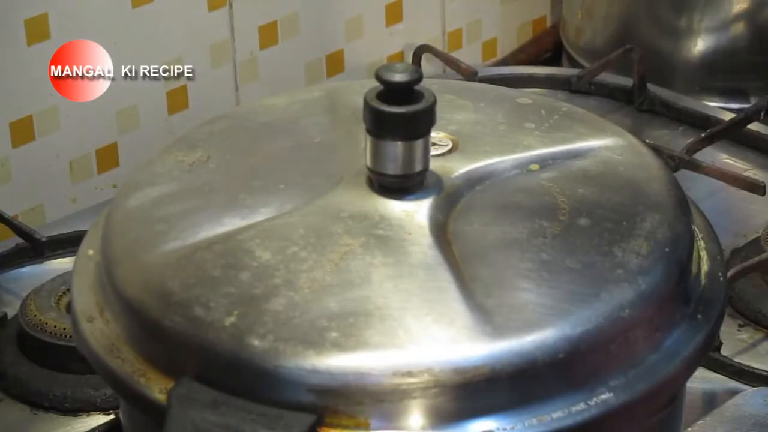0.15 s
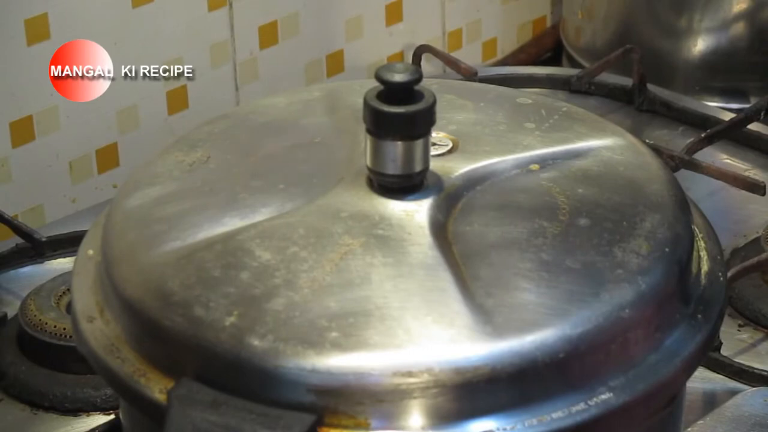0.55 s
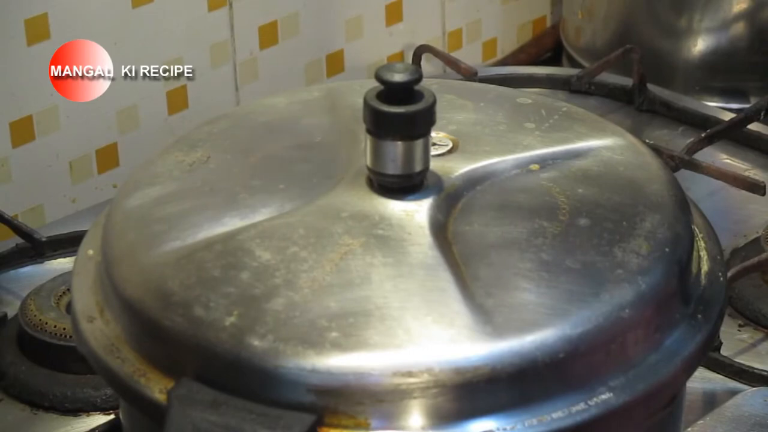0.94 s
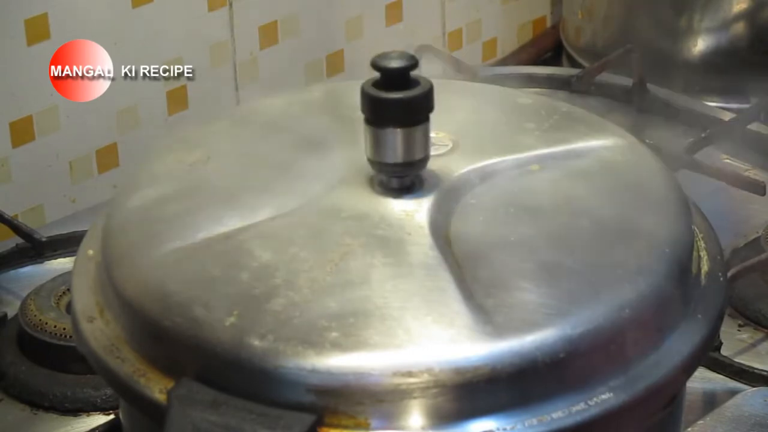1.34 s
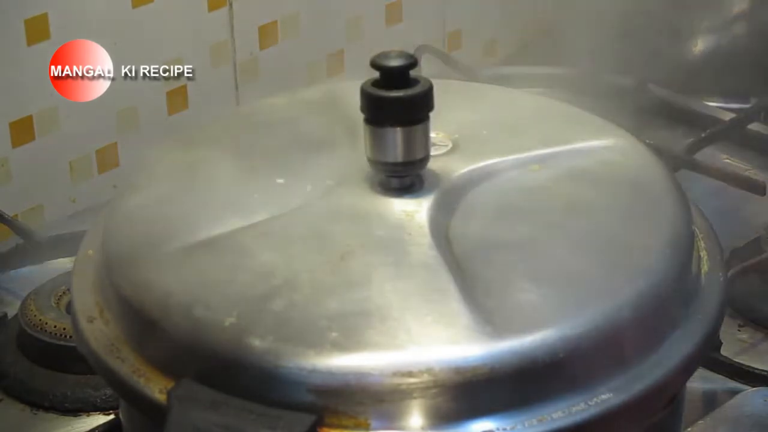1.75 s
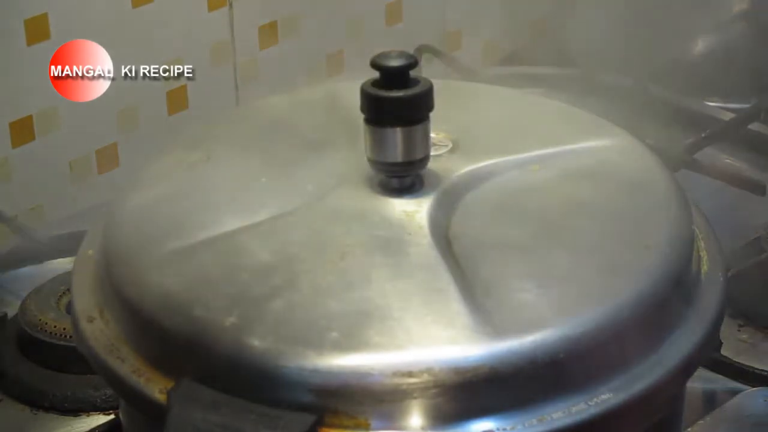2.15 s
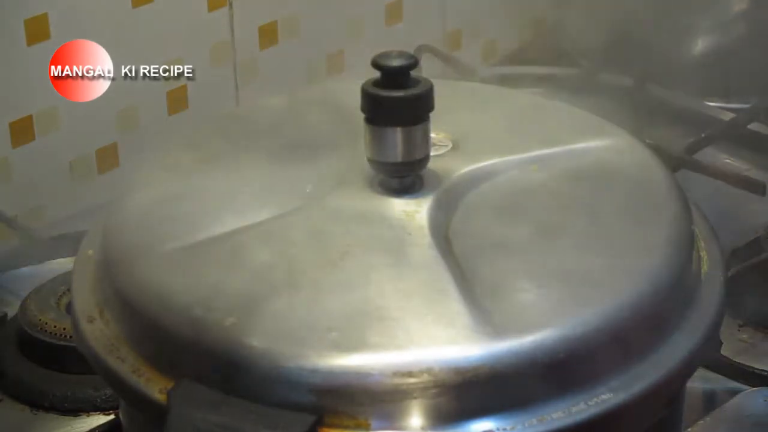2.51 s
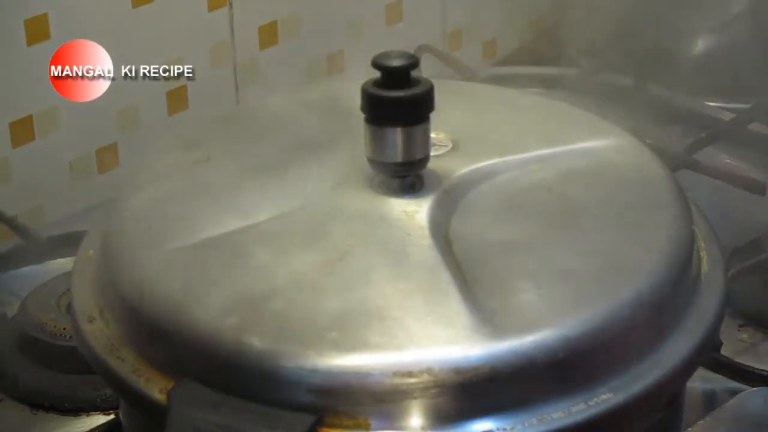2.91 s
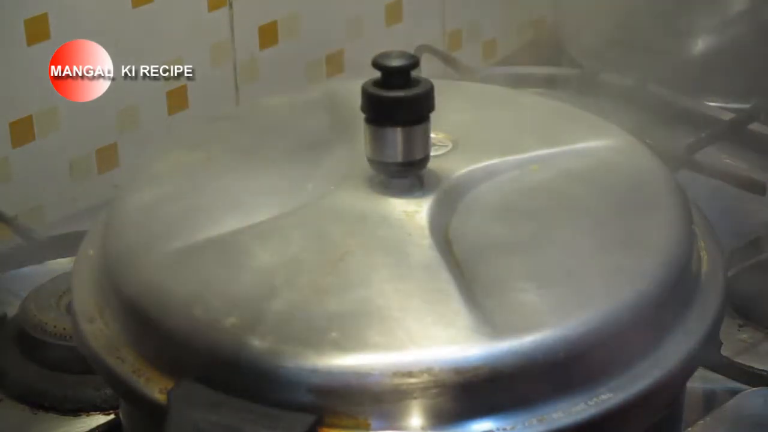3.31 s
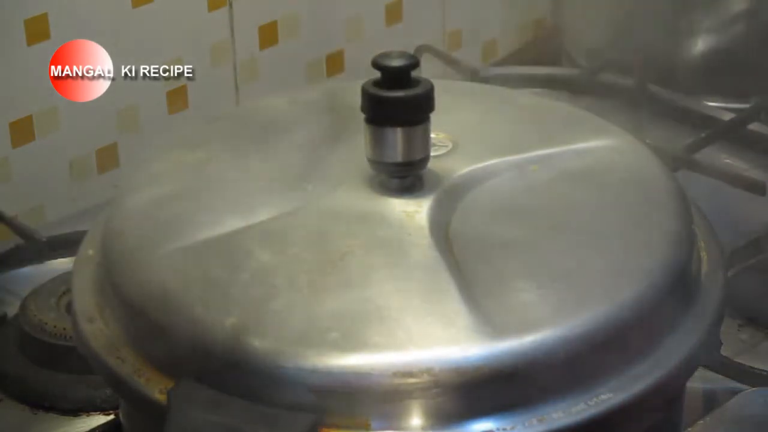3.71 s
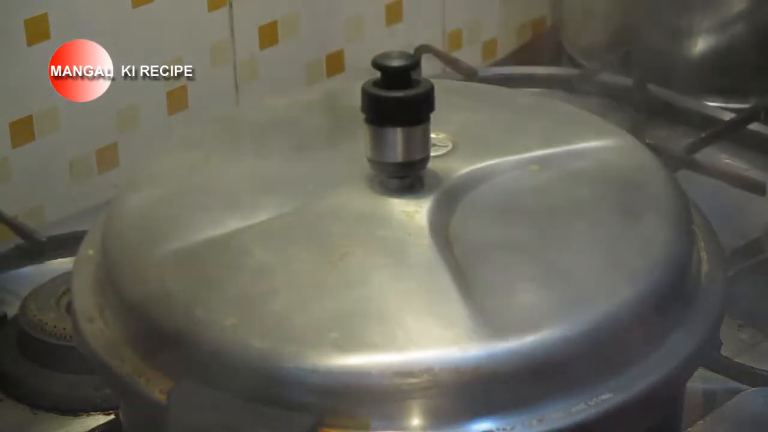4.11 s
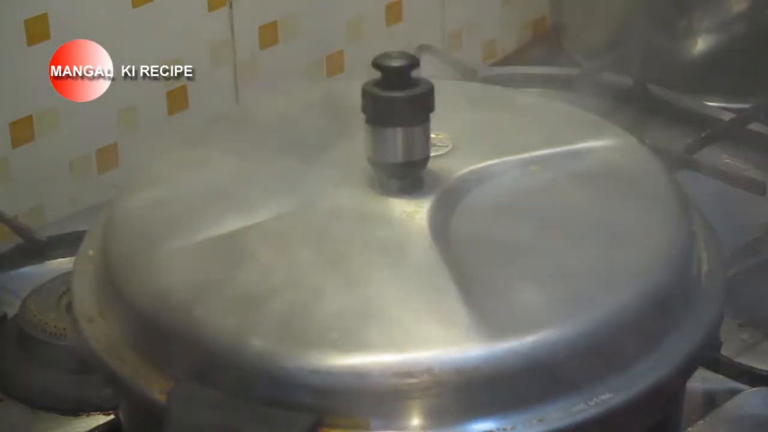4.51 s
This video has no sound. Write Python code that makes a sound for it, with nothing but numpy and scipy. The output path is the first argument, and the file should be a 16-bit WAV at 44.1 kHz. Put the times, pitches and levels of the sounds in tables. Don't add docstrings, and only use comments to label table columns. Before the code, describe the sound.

Weak, fizzing puffs of steam and soft ringing of a metal lid come first, above a low burner rumble and motor hum. At about 1.2 seconds there are sharp spits, a short knock, and then a dense steady rush of steam that buries the room. A couple of small pops dent the hiss, and a low boiling roar grows underneath late on. Close mono microphone, short tiled reflections.

```python
import sys
import numpy as np
from scipy import signal
from scipy.fft import rfft, irfft, next_fast_len
from scipy.io import wavfile
from scipy.ndimage import uniform_filter1d

SR = 44100
rng = np.random.default_rng(int(sys.argv[2]) if len(sys.argv) > 2 else 0)


def convert_level_to_amplitude(level_db):
    exponent = np.asarray(level_db, float) / 20
    return 10 ** exponent


def output_pcm(signal):
    pcm = np.clip(np.atleast_2d(signal).T, -1, 1) * 32767
    wavfile.write(sys.argv[1], SR, np.round(pcm).astype(np.int16))


N = 205461

# start_s, peak_db, limiter_dip_db
DROPS = [
    (1.156, -7, 0),
    (1.175, -9, 0),
    (2.081, -9, -3.5),
    (4.172, -12, -3.8),
]


def evened(x):
    return x / np.sqrt(np.mean(x ** 2) + 1e-20)


def read(points, hz):
    f, value = np.transpose(points)
    return np.interp(np.log(hz + 1), np.log(f + 1), value)


def bell(hz, centre_hz, width_hz):
    return 1 / (1 + (2 * (hz - centre_hz) / width_hz) ** 2)


def bells_db(hz, rows):
    return sum(db * bell(hz, centre, width) for centre, width, db in rows)


def shaped(x, gain):
    size = next_fast_len(len(x))
    return irfft(rfft(x, size) * gain(np.fft.rfftfreq(size, 1 / SR)), size)[:len(x)]


def coloured_noise(gain):
    return evened(shaped(rng.standard_normal(N), gain))


def drift(rate, spread_db):
    return convert_level_to_amplitude(spread_db * coloured_noise(lambda hz: bell(hz, 0, 2 * rate)))


def held(rows, rise_s, fall_s):
    t = np.arange(0, N + HOP, HOP) / SR
    power = 0
    for start, length, db in rows:
        attack = np.clip((t - start) / rise_s, 0, 1) ** 2
        release = np.exp(-2 * np.maximum(t - start - length, 0) / fall_s)
        power = power + convert_level_to_amplitude(2 * db) * attack * release
    return np.interp(np.arange(N) / SR, t, power)


HOP, FRAME = 128, 512


def valve(t):
    # start_s, flow_db, lift (0-1), wetness (0 dry, 1 moist, 2 wet)
    valve_states = [(0, -28, 0.26, -1), (.33, -31, 0.089, -3.5), (.72, -31.5, 0.091, 3), (.9, -29.5, .2, 0),
                    (1.09, -25, .2, 0), (1.14, -15.8, .35, .8), (1.19, -17.3, .65, .8),
                    (1.27, -17.5, 0.57, 1), (1.29, -19, 0.79, -0.1), (1.45, -20, 0.92, 0.04),
                    (1.95, -19.5, 0.94, 0.3), (2.1, -18.5, 0.89, 0.7), (2.4, -19.5, 0.91, 0),
                    (2.75, -19, 0.89, .9), (3.15, -20, 0.95, 0.8), (3.45, -19.5, 0.99, 2.5),
                    (4.15, -18.5, 0.99, 1.9), (4.66, -19.5, 0.94, 5.5)]
    start, *columns = np.transpose(valve_states)
    flow_db, lift, wet = (np.interp(t, start, column) for column in columns)
    share = [np.maximum(1 - abs(np.clip(wet, 0, 2) - k), 0) for k in range(3)]
    return flow_db, np.clip(lift, 0, 1), share


def puffs(t):
    # peak_s, swell_db, length_s
    tips = [(0.02, 5.5, 0.055), (.075, 2.5, 0.027), (0.18, 5.5, .08), (.25, 3.5, .06), (.33, -2, .03),
            (.385, 8, .07), (.435, 7, .07), (.49, 2.5, .05), (.575, 3.5, 0.049), (0.62, 4, 0.025),
            (0.696, 3.5, 0.022), (0.78, 3.5, 0.042), (0.827, 0.5, 0.034), (.95, 2, .06), (1.055, 4.5, .025),
            (1.125, 1.5, .025), (1.155, 2, .03), (1.207, 2.5, 0.033), (1.238, -2, .02), (1.264, 3.5, 0.023),
            (1.325, -1.5, .04), (1.373, 2.5, 0.058), (1.744, 2, 0.059), (1.915, 2, .08), (2.02, -2.6, .07),
            (2.065, 1.5, .03), (2.304, 0.7, 0.12), (2.8, 0.5, 0.11), (2.977, 3, 0.057), (3.83, 0.5, 0.13)]
    return sum(db * np.exp(-(2 * (t - peak) / length) ** 2) for peak, db, length in tips)


def steam_colour(hz, lift, share):
    # freq_hz, level_db (per Hz)
    leak = [(710, -29), (1200, -19), (1540, -18.5), (1670, -19.5), (2770, -12), (3620, -8.5), (3950, -10),
            (4210, -8), (4640, -9), (5330, -4), (6130, -10.5), (7850, -12.5), (10500, -10.5), (15600, -28)]
    # centre_hz, width_hz, level_db
    gap = [(5180, 420, 3.5), (6400, 700, 2), (10350, 1400, 4)]
    # freq_hz, level_db (per Hz)
    dry_jet = [(300, -36), (900, -24), (1500, -20.5), (2500, -11), (3800, -7.5), (4300, -5), (5500, -5.5),
               (7500, -4.5), (8500, -1), (9500, -3.5), (11800, -4), (13200, -14), (14600, -18),
               (15700, -21)]
    # freq_hz, level_db (per Hz)
    moist_jet = [(300, -34), (900, -28), (1500, -20.5), (2500, -11.5), (3800, -7.5), (4300, -6), (5500, -1),
                 (6500, -3), (8500, -5), (11000, -2), (12500, -3.5), (13300, -11), (14600, -20),
                 (15700, -21)]
    # freq_hz, level_db (per Hz)
    wet_jet = [(900, -32), (1500, -17), (2500, -10.5), (3800, -5.5), (4200, -3), (4900, -2.5), (6000, -5),
               (7800, -2.5), (9000, -2.5), (11800, -3), (13200, -10.5), (14600, -19), (15700, -18)]
    seated_db = read(leak, hz) + bells_db(hz, gap)
    open_db = sum(part * read(jet, hz) for part, jet in zip(share, [dry_jet, moist_jet, wet_jet]))
    return convert_level_to_amplitude(2 * ((1 - lift) * seated_db + lift * open_db))


def steam(patchy_db=0.63, flutter_db=0.43, level_db=-1.0):
    # centre_hz, width_hz, level_db
    lid = [(1290, 240, 6.5), (1734, 460, 3), (1890, 196, 3.5), (2396, 250, 2), (2524, 100, 3),
           (2750, 130, -2.5), (3230, 195, 1.5), (3435, 150, -4), (3980, 150, -5), (4180, 240, 3),
           (4630, 189, -1.5), (4830, 160, 3), (4950, 190, -0.8), (5450, 145, 4), (6060, 110, 0.7),
           (6620, 180, 2.0), (6970, 140, -4.5), (7070, 210, 3.5), (7700, 152, 0), (7750, 180, 0),
           (8620, 250, 6), (8700, 115, -6.5), (9160, 200, 1), (9650, 120, 1.5), (9400, 180, 1.3),
           (11260, 97, 0.5), (11100, 77, -0.5), (11100, 77, 2), (12050, 133, -1), (12420, 89, 2)]
    hz = np.fft.rfftfreq(FRAME, 1 / SR)[:, None]
    t = np.arange(N // HOP + 5) * HOP / SR
    flow_db, lift, share = valve(t)
    puff_db = puffs(t)

    def blend(seated, opened):
        return (1 - lift) * seated + lift * opened

    fizz_db = blend(-9, np.dot([3.5, 2.5, 0.2], share))
    fizz_db = fizz_db + blend(1.4, .4) * np.maximum(puff_db, 0)
    fizz_db = fizz_db + 1.2 * np.minimum(puff_db, 0)
    rush_db = blend(-8, np.dot([-11.5, -11.5, -9.5], share))
    rush_db = rush_db + blend(.55, 0.48) * puff_db
    rattle_db = 3.6
    rush_db = rush_db + rattle_db * np.sin(np.pi * lift) ** 2

    colour = steam_colour(hz, lift, share)
    low = 1 / (1 + (hz / 3500) ** 12)
    high = 1 / (1 + (7000 / (hz + 1)) ** 16)
    power = 0
    for zone, swell_db in [(1 - low - high, puff_db), (high, fizz_db), (low, rush_db)]:
        spectrum = zone * colour
        power = power + spectrum / spectrum.sum(0) * convert_level_to_amplitude(2 * (flow_db + swell_db))

    real, imaginary, patches = rng.standard_normal((3, len(hz), len(t)))
    patches = uniform_filter1d(patches, size=8, axis=0)
    patches = evened(uniform_filter1d(patches, size=24, axis=1))
    z = (real + 1j * imaginary) * np.sqrt(power) * convert_level_to_amplitude(patchy_db * patches)
    jet = signal.istft(z, nperseg=FRAME, noverlap=FRAME - HOP)[1][:N]
    jet = evened(jet) * np.sqrt(power.sum(0).mean())
    jet = shaped(jet, lambda f: convert_level_to_amplitude(bells_db(f, lid)))
    return tiles(jet) * drift(130, flutter_db) * convert_level_to_amplitude(level_db)


def tiles(x, wet_db=-7, t60=0.12, count=6):
    t = np.arange(round(.2 * SR)) / SR
    place = np.arange(N) / N * (count - 1)
    tails = rng.standard_normal((count, len(t))) * convert_level_to_amplitude(-60 * t / t60) * (t > .003)
    echoes = np.zeros(N)
    for k, tail in enumerate(tails):
        turn = np.cos(np.pi / 2 * np.clip(place - k, -1, 1))
        echoes += signal.oaconvolve(x * turn, tail / np.linalg.norm(tail))[:N]
    return (x + convert_level_to_amplitude(wet_db) * echoes) / np.hypot(1, convert_level_to_amplitude(wet_db))


def rings():
    # start_s, pitch_hz, peak_db, rise_s, t60_s
    knocks = [(.0, 649, -33, 0.022, 1.1), (0.031, 507, -33, .02, .8), (.125, 497, -30.5, 0.0062, 0.66),
              (.155, 757, -33, 0.017, 1.2), (.255, 1500, -34.5, .02, 1.8), (.44, 1493, -39, .02, 0.73),
              (.445, 505, -31.5, 0.014, 0.87), (.47, 740, -33, 0.013, .4), (.58, 510, -34, 0.014, 0.86),
              (1.21, 410, -30, .003, 0.06), (1.207, 512, -23.5, .004, .1), (1.209, 630, -30, .003, .07),
              (1.207, 760, -32, 0.0027, .05), (1.23, 498, -37, 0.01, .5), (1.292, 638, -31, 0.004, 0.2),
              (1.355, 658, -41, .01, 0.53), (4.335, 427, -47.5, .02, 1.5), (4.36, 601, -43, 0.017, 1.)]
    out = np.zeros(N)
    t = np.arange(round(.2 * SR)) / SR
    fade = np.cos(np.pi * t / t[-1] / 2) ** 0.75
    for start, hz, db, rise, t60 in knocks:
        shape = (1 - np.exp(-t / rise)) * convert_level_to_amplitude(db - 60 * t / t60) * fade
        tone = np.sin(2 * np.pi * (hz * t + rng.random()))
        out[round(max(start, 0) * SR):][:len(t)] += shape * tone
    return out * drift(20, 1.3)


def ducking():
    since = np.maximum(np.arange(N) / SR - 1.14, 0)
    fast_and_slow = [(-11, .03), (-6, 0.22)]  # dB, time constant s
    return sum(db * (1 - np.exp(-since / tau)) for db, tau in fast_and_slow)


def kitchen():
    # freq_hz, level_db (per Hz)
    hum = [(12, -43), (20, -20), (92, -4.5), (214, -6.5), (312, -5), (354, -6), (516, -4), (573, -5.5),
           (1050, -7.5), (2190, -23), (2380, -29), (2820, -36), (3000, -21), (3900, -56), (6600, -120)]
    # centre_hz, width_hz, level_db
    drones = [(50, 17, 5), (176, 37, 7.5), (500, 91, 2), (625, 22, 4)]
    # start_s, length_s, level_db (re flame)
    throbs = [(.02, .05, 1), (.11, 0.15, -4), (.37, 0.043, -9), (.58, .12, 1), (.82, .05, 2),
              (.92, 0.19, -4), (1.9, .2, 0), (2.24, 0.17, 1), (2.5, 0.46, -2), (2.95, 0.1, 3.5),
              (3.15, .3, -5.5), (3.75, .14, 4), (3.97, 0.088, 3.5), (4.33, .25, 0.5)]
    flame_db, motor_idle_db, motor_hz = -39, -12, 98
    flame = coloured_noise(lambda hz: convert_level_to_amplitude(read(hum, hz) + bells_db(hz, drones)))
    flame = flame * drift(7.6, 0.24) * convert_level_to_amplitude(4)
    motor = np.sin(2 * np.pi * np.cumsum(motor_hz * drift(7.46, 0.294)) / SR) * drift(15, 2.0)
    load = np.sqrt(convert_level_to_amplitude(2 * motor_idle_db) + held(throbs, 0.035, 0.035))
    return convert_level_to_amplitude(flame_db + ducking()) * (flame + motor * load)


def microphone():
    # freq_hz, level_db (per Hz)
    self_noise = [(2000, -30), (9000, -8), (13000, -6), (15700, 4)]
    hiss = coloured_noise(lambda hz: convert_level_to_amplitude(read(self_noise, hz)))
    return hiss * convert_level_to_amplitude(0.37 * ducking() - 50.5)


def boil():
    # centre_hz, width_hz, level_db
    pot = [(598, 85, -15.5), (870, 183, -4.5), (1142, 55, 0), (1258, 80, -0.5), (1430, 190, -7),
           (1650, 53, -16), (1950, 93, -3), (2000, 110, -16), (2450, 320, -9.5)]
    # start_s, length_s, level_db
    surges = [
        (1.135, .14, -41.5),
        (1.2, 0.061, -36),
        (3.31, 1.3, -36),
        (3.5, 0.8, -37),
        (3.93, .22, -34.5),
        (4.45, .4, -38),
    ]

    def modes(hz):
        return np.sqrt(sum(convert_level_to_amplitude(2 * db) * bell(hz, centre, width) ** 2 for centre, width, db in pot))

    roar = coloured_noise(modes) * drift(25, 0.32)
    since = np.arange(N) / SR - 1.2
    simmer_db = -52.5 + 3.5 * since
    simmer = (since > 0) * convert_level_to_amplitude(2 * simmer_db)
    return roar * np.sqrt(simmer + held(surges, 0.02, 0.035))


def spits():
    out = np.zeros(N)
    t = np.arange(300) / SR
    for start, db, _ in DROPS:
        pop = rng.standard_normal(len(t)) * np.exp(-t / 0.0019)
        pop = shaped(pop, lambda hz: bell(hz, 7500, 5500) ** 2)
        out[round(start * SR):][:len(t)] += convert_level_to_amplitude(db) * pop / abs(pop).max()
    return out


def dips():
    t = np.arange(N) / SR - .004
    recovery_s = 0.17
    dip_db = 0
    for start, _, db in DROPS:
        dip_db = dip_db + db * (t > start) * np.exp(-np.maximum(t - start, 0) / recovery_s)
    return convert_level_to_amplitude(dip_db)


def scene():
    mono = steam() + rings() + kitchen() + microphone() + boil() + spits()
    return np.tile(mono, (2, 1))


def top_cut(x):
    return signal.sosfilt(signal.butter(12, 15750, fs=SR, output="sos"), x)


def record(dry):
    mix = 1.23 * np.tanh(dips() * dry / 1.173)
    return top_cut(mix)


dry = scene()
out = record(dry)
output_pcm(out)
```